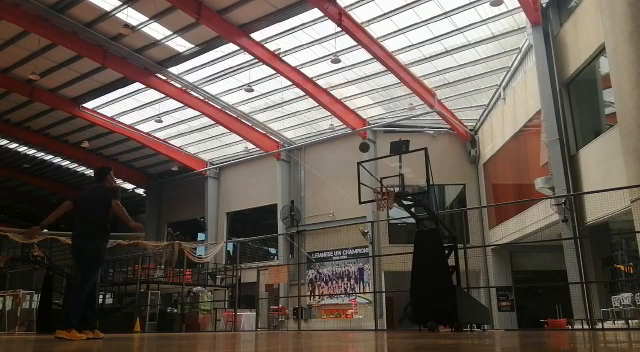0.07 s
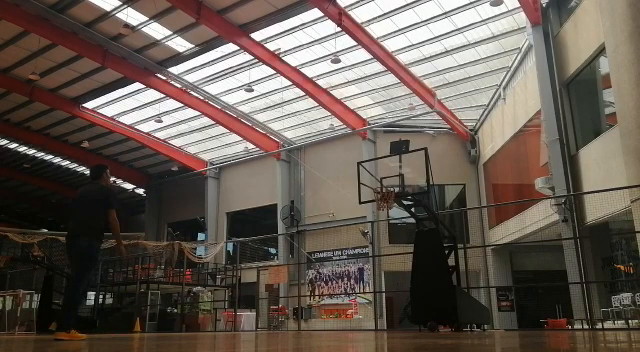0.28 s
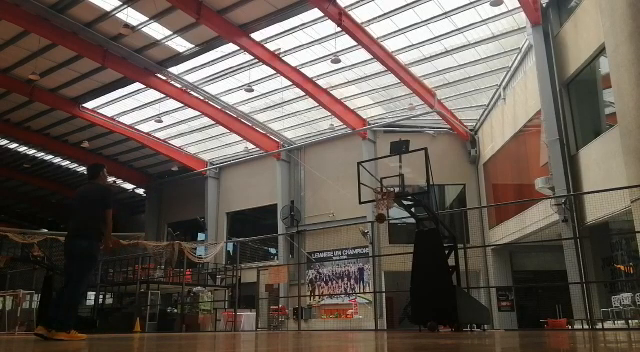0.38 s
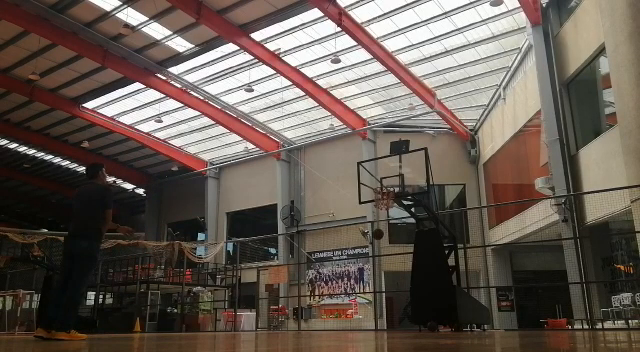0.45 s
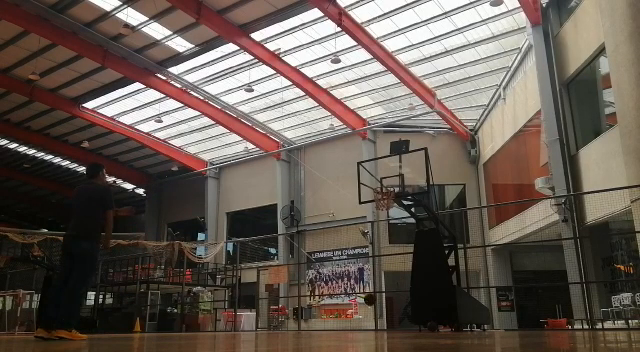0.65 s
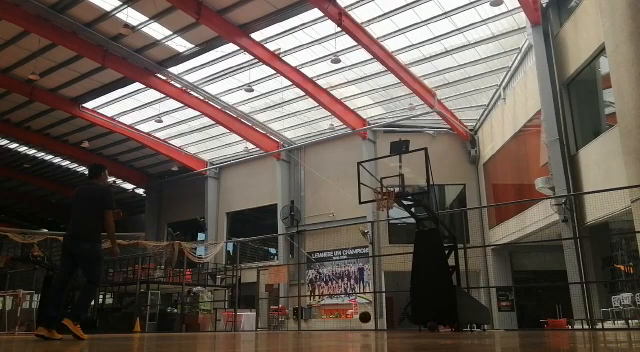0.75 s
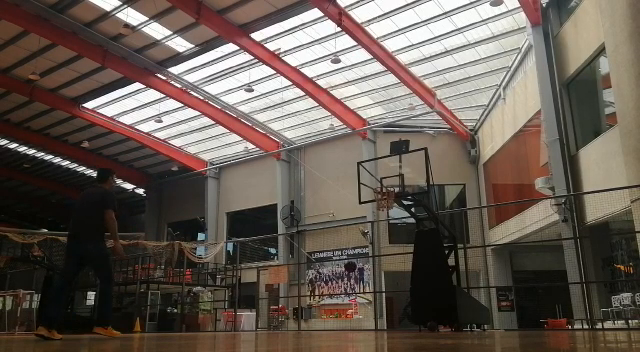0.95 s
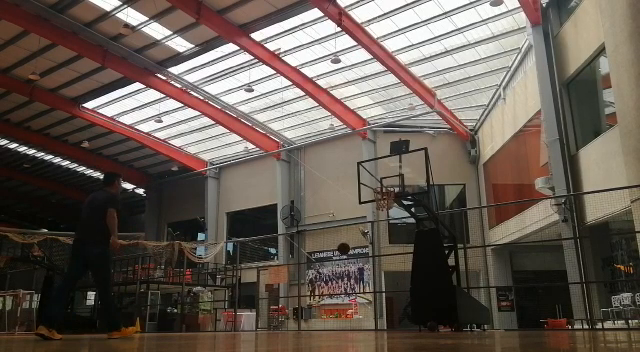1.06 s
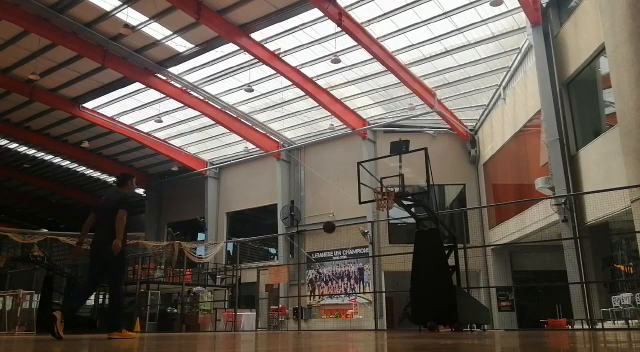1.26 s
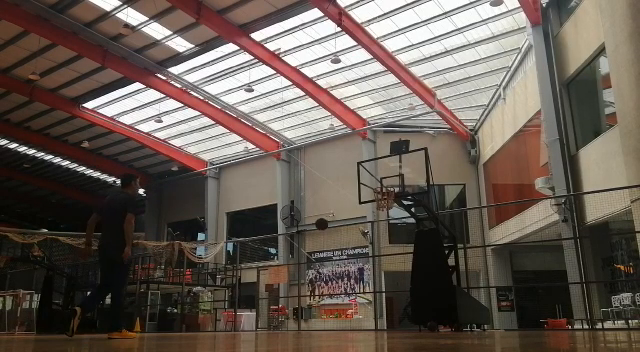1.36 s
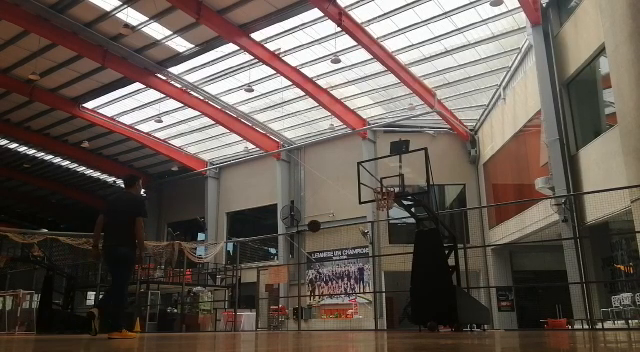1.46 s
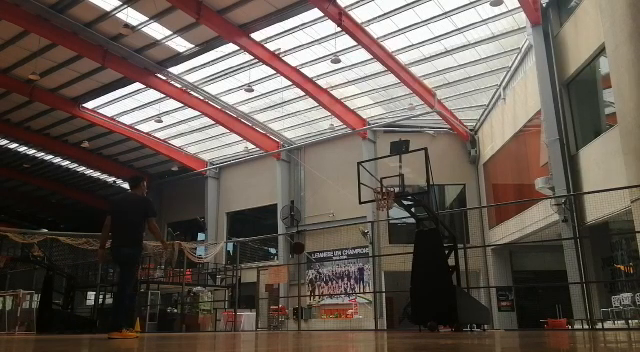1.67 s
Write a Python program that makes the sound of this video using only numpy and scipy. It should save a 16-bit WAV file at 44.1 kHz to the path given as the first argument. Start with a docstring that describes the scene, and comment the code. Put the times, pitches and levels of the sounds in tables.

```python
"""A thrown basketball knocks on a padded stand, drops and bounces once on the wooden floor of a sports hall.
The bounce layers a filtered click, a low thump and pinging air modes; the knocks are noise cracks over
the ringing modes of the frame. The walls answer with bright cracks, the roof with swelling bass booms.
Each blow leaves a tail of diffuse noise; a low rumble, a faint whine and soft footfalls lie beneath.
Levels are those before the final stereo balance."""
import sys
import numpy as np
from scipy import signal
from scipy.fft import rfft, irfft, next_fast_len
from scipy.io import wavfile

SR = 44100
rng = np.random.default_rng(int(sys.argv[2]) if len(sys.argv) > 2 else 0)


def unload_wav(signal):
    """Save mono or channel-first audio to the path in sys.argv[1] as 16-bit WAV at rate SR, clipped to [-1, 1]."""
    wavfile.write(
        sys.argv[1],
        SR,
        np.round(np.clip(np.atleast_2d(signal).T, -1, 1) * 32767).astype(np.int16),
    )


N = 74970
T = np.arange(N) / SR
SIZE = next_fast_len(2 * N)  # padded FFT length
FREQS = np.maximum(np.arange(SIZE // 2 + 1) * SR / SIZE, 1)  # Hz
OPPOSED = np.array([[1], [-1]])  # left and right in opposite polarity


def from_db(db):
    """Decibels to gain."""
    return 10 ** (np.asarray(db) / 20)


def rms_one(x):
    """Scale to unit rms."""
    return x / np.sqrt(np.mean(x ** 2) + 1e-20)


def at_hz(points, hz):
    """Read a table on a log-frequency axis."""
    f, v = np.transpose(points)
    return np.interp(np.log(hz), np.log(f), v)


def since(s):
    """Seconds since s, zero before."""
    return np.maximum(T - s, 0)


def colour(x, points):
    """Causal, minimum-phase filter following a (f/Hz, level/dB) table, built by folding its cepstrum."""
    cepstrum = irfft(np.log(from_db(at_hz(points, FREQS))), SIZE)
    cepstrum[1:SIZE // 2] *= 2
    cepstrum[SIZE // 2 + 1:] = 0
    response = np.exp(rfft(cepstrum))
    return irfft(rfft(x, SIZE) * response, SIZE)[..., :N]


def pan_gains(db, pan_db):
    """Left and right gains around a level; pan_db is left minus right."""
    return from_db([[db + pan_db / 2], [db - pan_db / 2]])


def burst(s, db, decay, pan_db, spectrum):
    """A short scattered crack: decaying stereo noise, coloured by the surface it comes from."""
    scatter = 0.79  # left-right difference relative to the common part
    common, apart = rng.standard_normal((2, N))
    noise = common + scatter * apart * OPPOSED
    puff = colour(noise * (T > s) * np.exp(-since(s) / decay), spectrum)
    # each side gets the energy of a unit-rms noise with this decay
    puff *= np.sqrt(decay * SR / 2 / np.sum(puff ** 2, axis=1, keepdims=True))
    return pan_gains(db, pan_db) * puff


def ring(s, hz, db, t60):
    """One struck mode: a sine that starts at s and falls 60 dB in t60 seconds."""
    return np.sin(2 * np.pi * hz * since(s)) * from_db(db - 60 * since(s) / t60)


def ring_modes(s, modes):
    """A body struck at s: all its modes ring together, first swing negative."""
    return -sum(ring(s, hz, db, t60) for hz, db, t60, _ in modes)


def boom(s, db, hz, rise):
    """A few bass cycles whose envelope peaks after the rise time in seconds, then fades."""
    u = since(s) / rise
    envelope = (u * np.exp(1 - u)) ** 2
    return -from_db(db) * envelope * np.sin(2 * np.pi * hz * since(s))


# Likeness of the two sides in sound from all around: f/Hz, left-right correlation [-1 to 1]
SIDE_CORRELATION = [(100, 0.96), (250, 0.98), (500, 0.7), (1000, 0), (3000, 0), (12000, 0)]


def diffuse(gain):
    """Spectrum of unit-rms stereo noise arriving from all sides, alike in the bass only."""
    mid, side = rfft(rng.standard_normal((2, SIZE)))
    alike = np.clip(at_hz(SIDE_CORRELATION, FREQS), -1, 1)
    mid = np.sqrt((1 + alike) / 2) * mid
    side = np.sqrt((1 - alike) / 2) * side
    return rms_one(gain) * (mid + side * OPPOSED)


# Plain reverberation time, before the swell of each blow: f/Hz, t60/s
HALL_T60 = [(60, 3.06), (150, 2.75), (400, 1.79), (1000, 1.99), (3000, 2.51), (5500, 2.16), (7500, 1.4),
            (9000, 1.04), (13000, 0.8)]


def hall(s, db, spectrum, modes, swell):
    """Diffuse tail of one blow, carrying its modes; each band dies at its own rate, shaped by the swell."""
    mode_width_hz = 19.6  # half width of each hall mode's peak, where its amplitude is halved (-6 dB)
    power = from_db(2 * db) * rms_one(from_db(at_hz(spectrum, FREQS))) ** 2
    for hz, _, _, hall_db in modes:
        peak = rms_one(1 / (1 + ((FREQS - hz) / mode_width_hz) ** 2))
        power = power + (from_db(hall_db) * peak) ** 2
    field = diffuse(np.sqrt(power)) * np.sqrt(power.mean())
    centres, t60s = np.transpose(HALL_T60)
    tail = 0
    for share, t60 in zip(np.eye(len(centres)), t60s):
        crossfade = np.interp(np.log(FREQS), np.log(centres), share)
        band = irfft(field * crossfade, SIZE)[:, :N]
        tail = tail + band * from_db(-60 * since(s) / t60)
    return tail * (T > s) * from_db(np.interp(since(s), *np.transpose(swell)))


# Colour of the room rumble: f/Hz, relative level/dB
RUMBLE_COLOUR = [(25, -21), (50, -9), (85, -6), (135, -13.5), (260, -25.5), (450, -34.5), (900, -38),
                 (2500, -46.5), (5000, -55.5), (7200, -64), (8600, -69.5), (13000, -76), (15000, -86)]


def rumble():
    """Steady low rumble of the hall: coloured diffuse noise."""
    return from_db(-46) * irfft(diffuse(from_db(at_hz(RUMBLE_COLOUR, FREQS))), SIZE)[:, :N]


def whine():
    """Faint electrical whine: one steady high sine."""
    whine_hz, whine_db = 12930, -97
    return from_db(whine_db) * np.sin(2 * np.pi * whine_hz * T)


# Soft footfalls: t/s, level/dB
FOOTFALLS = [(0.177, -35), (.255, -38), (0.361, -37)]


def footfalls():
    """Soft steps on the sprung floor: each a slow-swelling bass boom."""
    step_hz, step_rise_s = 76.1, 0.031
    return sum(boom(s, db, step_hz, step_rise_s) for s, db in FOOTFALLS)


# Booms thrown back by the roof: t/s, level/dB, f/Hz, rise/s
ROOF_BOOMS = [(.4420, -29, 78, 0.011), (0.4695, -20.5, 131.6, .008), (0.5392, -26.5, 150, 0.0078),
              (.5610, -29, 132, 0.0087), (0.676, -31.5, 206.4, .012), (0.916, -24, 110, .007),
              (.9310, -15, 133, 0.0073), (1.0037, -17, 143, 0.0061), (1.1400, -26, 145.3, 0.0074),
              (1.214, -30, 224, .006), (1.2229, -23.5, 95, 0.0086), (1.291, -32, 71, 0.019),
              (1.3789, -28.5, 135, 0.0051), (1.4214, -32, 137.3, 0.011)]


def roof_echoes():
    """The roof returns the bass of the blows as swelling booms."""
    return sum(boom(*row) for row in ROOF_BOOMS)


# Slaps thrown back by the walls: t/s, level/dB, decay/s, left minus right/dB
WALL_ECHOES = [(0.8886, -19, 0.0005, -4), (0.8999, -25.5, 0.0016, -11), (0.9012, -22, 0.00066, -13),
               (0.9077, -29, 0.0018, -4), (0.933, -32, .0015, -1), (.9380, -34, 0.00079, -7.5)]
# Colour of the wall slaps: f/Hz, relative level/dB
WALL_COLOUR = [(290, -33), (600, -14), (950, 1), (1700, -6.5), (2840, 5), (4540, -7), (6300, -5.5),
               (8860, -33), (11400, -39), (15000, -54)]


def wall_echoes():
    """The walls return the bounce as bright, scattered slaps."""
    return sum(burst(*row, WALL_COLOUR) for row in WALL_ECHOES)


# Knocks on the stand, with rattles and first echoes:
# t/s, level/dB, decay/s, left minus right/dB, treble tilt/(dB per octave)
KNOCKS = [(0.4119, -36, 0.00059, 5, -6), (0.4152, -25.5, 0.0023, 4.5, -0.5),
          (0.4288, -31, 0.0037, 0.5, 0.5), (0.4376, -26.5, .003, -3, -4.5), (.4513, -48, .001, 4, 19),
          (0.4678, -39, 0.0052, -1, 0.5), (0.474, -31, .005, -2, -5.5), (0.5163, -45, 0.0016, 6, 9)]
# Shared colour of the knocks before tilting: f/Hz, relative level/dB
KNOCK_COLOUR = [(200, 1), (600, 1), (850, -8), (1200, 4.5), (1800, -3), (2700, -7), (6000, -15.5),
                (8500, -27.5), (12500, -30), (15000, -57)]


def knocks():
    """Ball on padding, rattles and first echoes: noise cracks, each tilted around 1 kHz."""
    out = 0
    for *row, tilt in KNOCKS:
        tilted = [(hz, db + tilt * np.log2(hz / 1000)) for hz, db in KNOCK_COLOUR]
        out = out + burst(*row, tilted)
    return out


# Modes of the stand: f/Hz, level/dB before the onset swell, t60/s, level in the hall/dB before the tail decay
STAND_MODES = [(70.1, -26, 0.43, -43.5), (142.2, -19, 0.16, -41.5), (193, -23, 0.08, -52),
               (403, -16.5, 0.099, -41), (444, -57, 0.043, -40.5), (579, -31, 0.12, -50.5),
               (702, -29.5, .06, -69), (1080, -41, 0.31, -49), (1217, -33, 0.11, -55),
               (1406, -47, 0.49, -52.5), (2070, -38, 0.023, -72), (2760, -37, 0.065, -61.5),
               (5800, -47, .07, -68)]
# Colour of the stand's tail: f/Hz, relative level/dB
STAND_HALL = [(24, -45), (40, -20.5), (69, -5.5), (98, -15.5), (153, -0.5), (338, -13.5), (401, -12),
              (597, -20), (956, -20.5), (1080, -19.5), (1920, -30), (5560, -42.5), (12300, -52),
              (15000, -80)]
# Swell of that tail about the plain decay: t/s after the blow, level/dB
STAND_SWELL = [(0, -3), (0.022, -4.5), (.12, -0.5), (.2, -3), (.3, -1), (0.462, -2)]


def stand():
    """The ball knocks on the padded stand; the padding gives, then the frame swells up and rings."""
    stand_s, give_s, swell_s = 0.4128, 0.003, 0.0061
    start = stand_s + give_s
    frame = ring_modes(start, STAND_MODES) * (1 - np.exp(-since(start) / swell_s))
    tail = hall(stand_s, -29.5, STAND_HALL, STAND_MODES, STAND_SWELL)
    return knocks() + frame + tail


# Slap of the ball on the boards: f/Hz, relative level/dB
SLAP_COLOUR = [(120, -28), (250, -20), (600, -13.5), (950, 3), (1500, -2), (2000, -5), (2700, 1),
               (3800, -3.5), (5760, -9), (7420, -13.5), (8720, -27.5), (11900, -23), (13500, -39),
               (15000, -40)]
# Air modes of the ball: f/Hz, level/dB, t60/s, level in the hall/dB before the tail decay
BALL_MODES = [(926, -31.5, 0.11, -51.5), (1301, -37, 0.13, -49.5), (1590, -39.5, 0.086, -60.5),
              (1663, -36.5, 0.11, -64), (2540, -58, .08, -54.5), (2640, -51, .08, -52.5),
              (2760, -42, 0.071, -54.5), (2950, -40, .08, -53.5)]
# Colour of the bounce's tail: f/Hz, relative level/dB
BOUNCE_HALL = [(24, -40), (40, -33), (74, -3), (153, -2.5), (382, -19.5), (804, -21.5), (910, -20.5),
               (1030, -18.5), (1320, -21.5), (2060, -23.5), (3830, -27), (7130, -37.5), (8480, -47),
               (11400, -48), (15000, -71)]
# Swell of that tail about the plain decay: t/s after the blow, level/dB
BOUNCE_SWELL = [(0, -7.5), (.035, -3), (.07, -0.5), (.2, 3.5), (.32, 3), (.46, 3.5), (.54, 0), (0.641, -1),
                (.81, 2.5)]


def bounce():
    """A sharp slap on the boards, a thump and the ping of the air in the ball."""
    bounce_s, thump_lag_s = 0.8855, 0.002
    slap = colour(signal.unit_impulse(N, int(bounce_s * SR)), SLAP_COLOUR)
    slap = -pan_gains(-10, -2) * slap / np.abs(slap).max()
    thump = ring(bounce_s + thump_lag_s, hz=128, db=-17.5, t60=0.076)
    ping = ring_modes(bounce_s, BALL_MODES)
    tail = hall(bounce_s, -29, BOUNCE_HALL, BALL_MODES, BOUNCE_SWELL)
    return slap + thump + ping + tail


def scene():
    """Room bed, echoes and both blows in the hall."""
    background = rumble() + whine() + footfalls()
    echoes = roof_echoes() + wall_echoes()
    return background + echoes + stand() + bounce()


# Balance of the stereo pair: f/Hz, left minus right/dB
STEREO_BALANCE = [(60, -6.5), (200, -5.5), (400, -6.5), (1200, -4), (2400, -3), (4400, -6.5), (7200, -7),
                  (8600, 0.5), (13000, 12)]


def lean(x, points):
    """Tilt a stereo pair by a (f/Hz, left minus right/dB) table, half on each side."""
    left, right = x
    left = colour(left, [(hz, db / 2) for hz, db in points])
    right = colour(right, [(hz, -db / 2) for hz, db in points])
    return np.array([left, right])


def record(dry):
    """The right microphone is louder but duller; a steep low-pass cuts the top."""
    cutoff_hz = 15800  # stopband edge, 70 dB down
    low_pass = signal.cheby2(16, 70, cutoff_hz, fs=SR, output="sos")
    return signal.sosfilt(low_pass, lean(dry, STEREO_BALANCE))


dry = scene()
out = record(dry)
unload_wav(out)
```